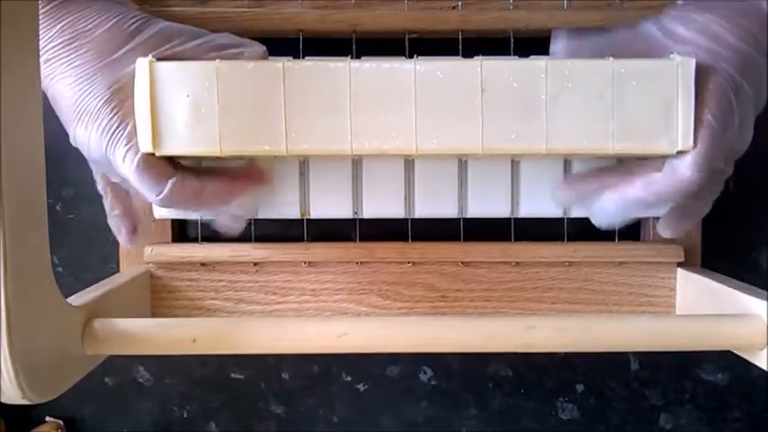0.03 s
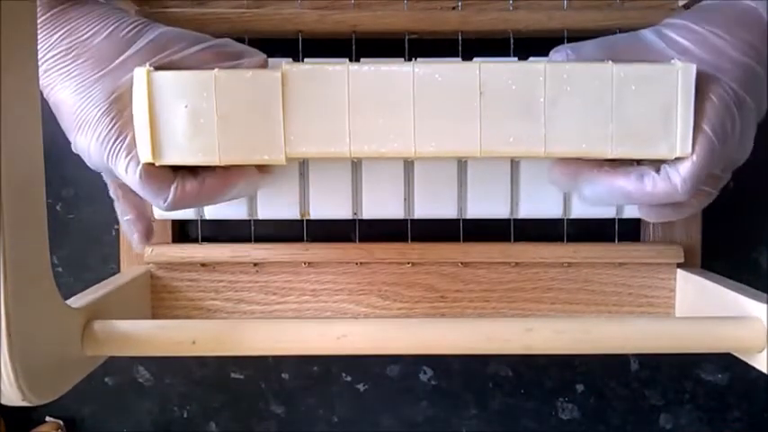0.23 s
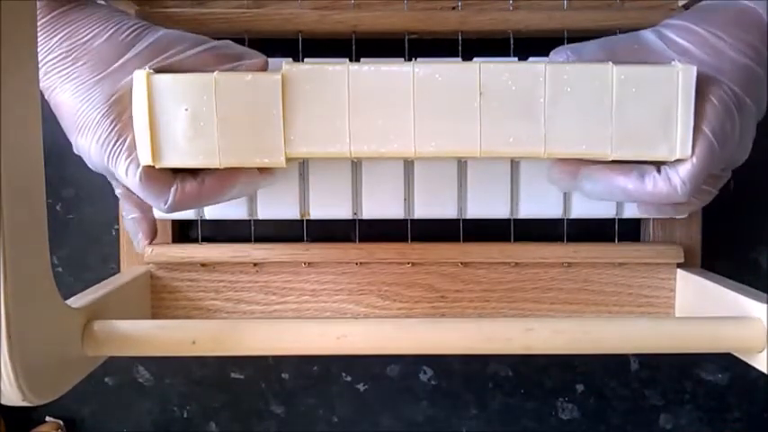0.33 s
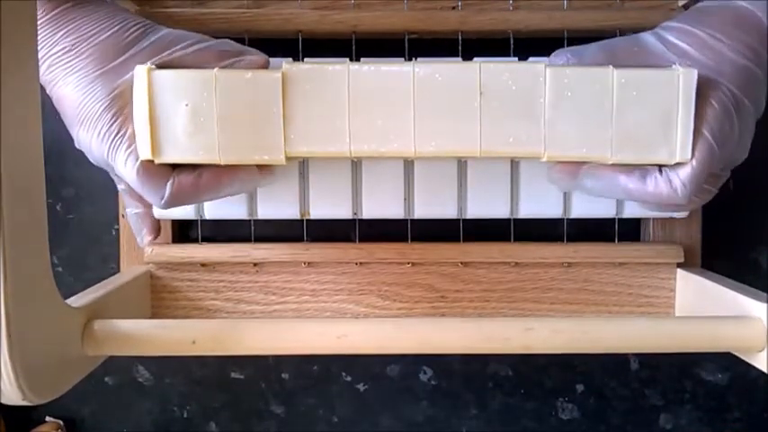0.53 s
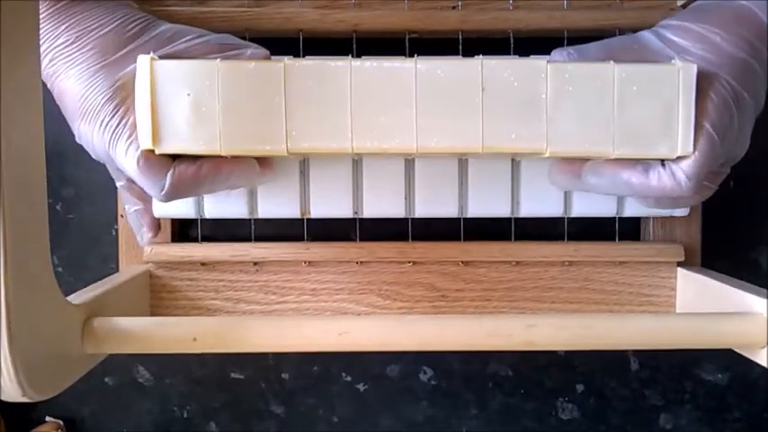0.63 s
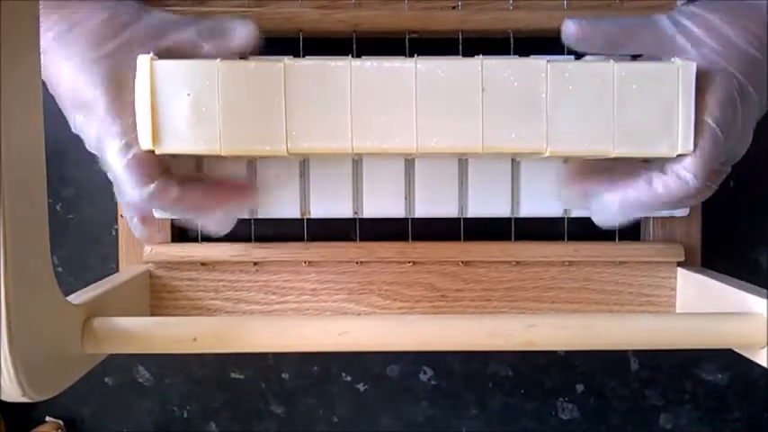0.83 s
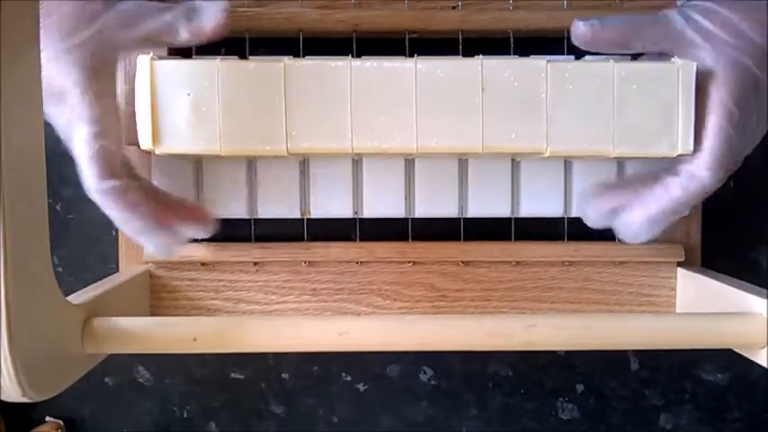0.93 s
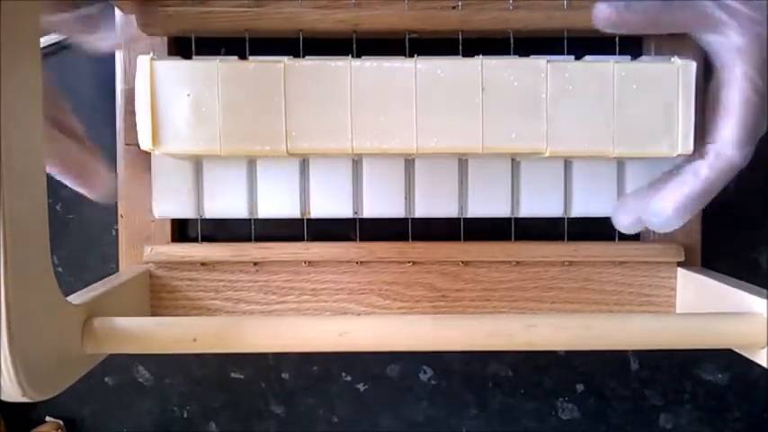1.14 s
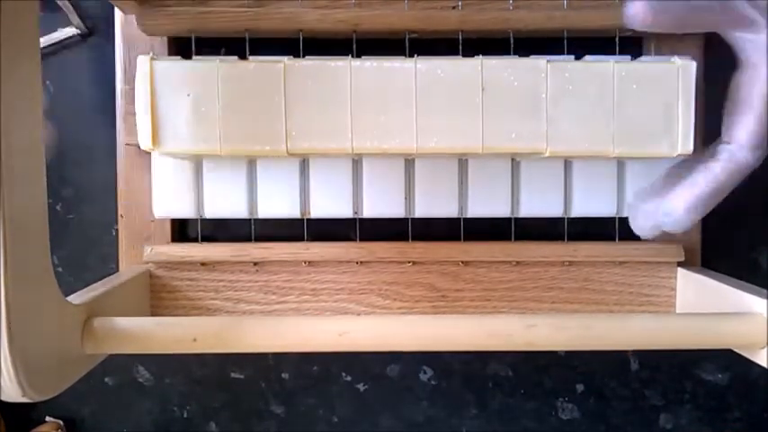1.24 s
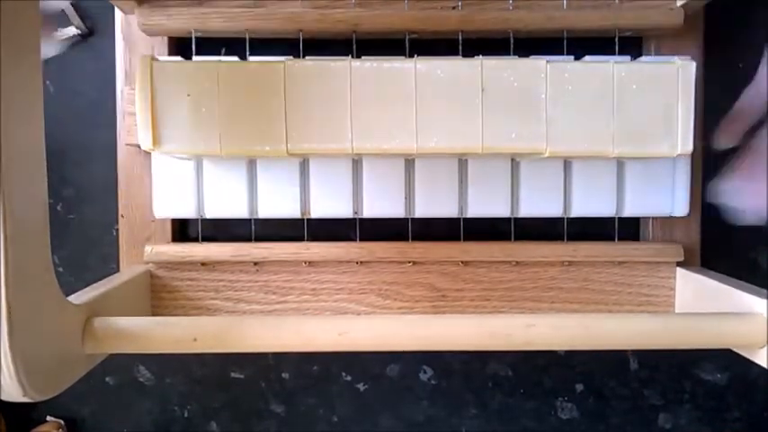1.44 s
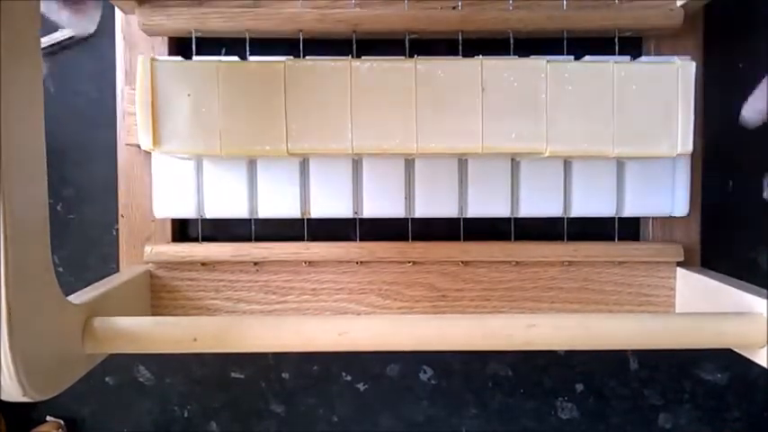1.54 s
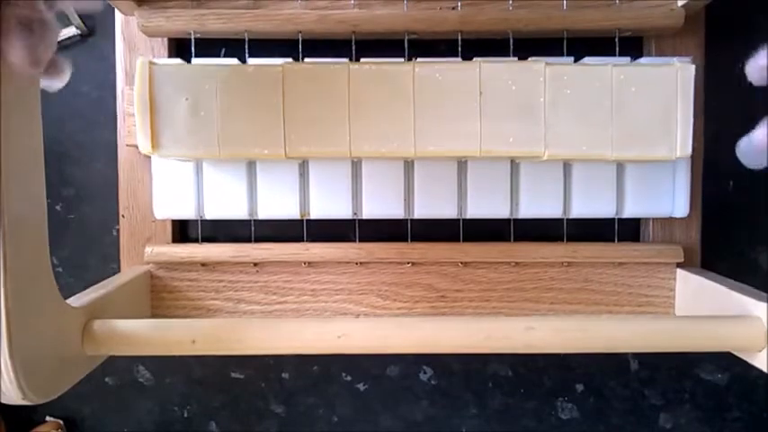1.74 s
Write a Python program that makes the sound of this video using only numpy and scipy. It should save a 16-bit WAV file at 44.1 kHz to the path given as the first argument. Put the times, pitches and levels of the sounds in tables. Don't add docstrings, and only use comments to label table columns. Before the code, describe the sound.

A soap block knocks sharply on a wooden wire cutter, bounces quickly with rattling wires, then bumps the counter and gets light dull taps; gloves crinkle close to a small microphone in a quiet humming room.

```python
import sys
import numpy as np
from scipy import signal
from scipy.fft import rfft, irfft
from scipy.io import wavfile
from scipy.ndimage import uniform_filter1d

SR = 44100
rng = np.random.default_rng(int(sys.argv[2]) if len(sys.argv) > 2 else 0)


def gain_from_db(level_db):
    decades = np.asarray(level_db, float) / 20
    return 10 ** decades


def bounce(signal):
    frames = np.transpose(np.atleast_2d(signal))
    limited = np.clip(frames, -1, 1)
    pcm = np.round(limited * 32767).astype(np.int16)
    wavfile.write(sys.argv[1], SR, pcm)


N = 79380
KNOCK_S = .2112
WET_DB = -12


def evened(x):
    return x / np.sqrt(np.mean(x ** 2) + 1e-20)


def read(points, hz):
    f, value = np.transpose(points)
    return np.interp(np.log(hz + 1), np.log(f + 1), value)


def level(points):
    s, db = np.transpose(points)
    return gain_from_db(np.interp(np.arange(N) / SR, s, db))


def add(mix, s, sound):
    part = mix[round(s * SR):][:len(sound)]
    part += sound[:len(part)]


def colour(x, points):
    return evened(irfft(rfft(x) * gain_from_db(read(points, np.fft.rfftfreq(N, 1 / SR))), N))


def grains(per_s, spread_db):
    on = rng.random(N) < per_s / SR
    sign = rng.standard_normal(N)
    size = np.minimum(rng.exponential(1, N), 4)
    return on * sign * gain_from_db(spread_db * size) + 0.2 * rng.standard_normal(N)


def rise(t):
    return np.sin(np.pi / 2 * np.clip(t / 0.0039, 0, 1)) ** 2


def struck(blows, modes):
    out, t = np.zeros(N), np.arange(SR // 2) / SR
    rings = np.array([gain_from_db(db - 60 * t / t60) * np.sin(2 * np.pi * hz * t) for hz, db, t60 in modes])
    shape = (30, len(modes))
    spots = gain_from_db(1.5 * rng.standard_normal(shape)) * rng.choice([-1, 1], shape)
    spots[:, :2] = abs(spots[:, :2])
    for (s, db, contact_ms), spot in zip(blows, spots):
        push = np.sin(np.pi * np.minimum(t[:600] / (contact_ms / 1000), 1)) ** 2
        add(out, s, gain_from_db(db) * signal.fftconvolve(spot @ rings, push / push.sum()) / 2)
    return out


# (time [s], level [dB])
HUM = [(0, -62), (.12, -60), (.3, -59), (.55, -69), (.9, -62), (1.1, -60.5), (1.18, -57.5), (1.22, -68),
       (1.33, -61.5), (1.5, -63.5), (1.8, -63.5)]


def room_hum():
    hum_hz, width_hz = 170, 3
    noise = [1, 1j] @ rng.standard_normal((2, N))
    waver = signal.lfilter([1], [1, -np.exp(-np.pi * width_hz / SR)], noise)
    tone = (waver * np.exp(2j * np.pi * hum_hz * np.arange(N) / SR)).real
    return level(HUM) * evened(tone)


# (time [s], level [dB])
SLIDE = [(0, -54.5), (.1, -66.5), (.7, -67), (.85, -58), (1.05, -61.5), (1.25, -63), (1.45, -59.5),
         (1.56, -57.5), (1.65, -62), (1.8, -64)]
# (frequency [Hz], density [dB per Hz])
SLEEVE = [(200, -3), (500, 8.5), (1000, -4), (2200, 1.5), (3200, -2.5), (4500, -16.5)]


def sleeves():
    return colour(rng.standard_normal(N), SLEEVE) * level(SLIDE)


# (frequency [Hz], density [dB per Hz])
AIR = [(12, -33), (20, -1.5), (107, -7.5), (241, -15.5), (422, -12), (574, -13.5), (624, -17), (780, -19),
       (16000, -31.5)]


def room_air():
    return gain_from_db(-57) * colour(rng.standard_normal(N), AIR)


# (time [s], level [dB])
RUB = [(0, -56), (.018, -53), (.023, -42.5), (.06, -52), (.12, -68), (.2, -68.5), (.85, -68), (.9, -58.5),
       (.945, -55), (1.03, -62), (1.1, -65), (1.2, -62), (1.3, -71.5), (1.46, -64), (1.56, -66.5),
       (1.66, -60.5), (1.8, -63.5)]
# (frequency [Hz], density [dB per Hz])
GLOVE = [(300, -35), (1000, 0), (2200, 0), (3500, -6), (5200, 4.5), (7000, -1.5), (9000, -14), (12000, -56)]
# (time [s], level [dB], pitch [Hz], t60 [s], width [share of pitch])
SNAPS = [(0.0202, -25, 4100, 0.0084, 0.66), (0.0235, -33.5, 5370, 0.017, 0.096),
         (.785, -46, 2050, 0.05, 0.04), (0.786, -51, 2810, 0.13, 0.053), (0.881, -51, 4630, 0.023, 0.27),
         (0.891, -48, 4100, 0.056, 0.034), (0.9035, -43, 4100, 0.016, 0.094),
         (1.466, -39, 7440, 0.013, 0.1), (1.466, -45.5, 4800, 0.015, 0.37), (1.192, -55, 3986, 0.13, 0.018),
         (1.617, -58, 4060, 0.23, 0.016), (1.611, -57, 2800, 0.072, 0.058),
         (0.0202, -26.5, 6800, 0.0083, 0.22), (0.0236, -34.5, 6800, 0.014, 0.071),
         (.046, -48, 4100, 0.033, .06), (0.211, -39, 7000, 0.0093, 0.19), (.896, -54, 5500, .06, 0.11),
         (.928, -52.5, 6600, 0.043, 0.063), (.939, -52, 8450, 0.025, .3), (.944, -50.5, 5400, 0.077, 0.069),
         (.944, -50.5, 6800, 0.038, 0.074), (0.986, -49, 2670, 0.025, .15), (.811, -57.5, 3120, 0.037, .05),
         (0.2124, -33, 4010, 0.038, 0.048), (.2125, -39, 4700, 0.033, 0.044),
         (0.2128, -36, 5310, 0.036, .05), (.263, -43.5, 4100, 0.06, .06), (.263, -48.5, 5120, 0.06, 0.078),
         (.812, -40, 720, .08, .1), (.287, -31, 660, .06, .06), (.0204, -36, 1900, .012, .4),
         (.9895, -38, 740, .03, .12)]


def gloves():
    crinkles_per_s, crinkle_spread_db = 2500, -1
    out = colour(grains(crinkles_per_s, crinkle_spread_db), GLOVE) * level(RUB)
    t = np.arange(3000) / SR
    noise = rng.standard_normal((16, 3000))
    noise = np.vstack([noise, noise[:, ::-1]])
    for (s, db, hz, t60, wide), n in zip(SNAPS, noise):
        edges = [hz / (1 + wide), hz * (1 + wide)]
        band = signal.lfilter(*signal.butter(3, edges, "band", fs=SR), n)
        start = np.minimum(t * wide / 0.000079, 1)
        add(out, s, evened(band) * gain_from_db(db - 60 * t / t60) * start)
    return out


# (frequency [Hz], t60 [s])
ROOM = [(60, 0.27), (250, 0.33), (1000, 0.25), (4000, 0.42), (9000, 0.14)]


def room(x):
    taps = np.zeros(SR // 2)
    at = np.arange(150, SR // 2 - 20, 20)
    taps[at + rng.integers(0, 20, len(at))] = rng.choice([-1., 1.], len(at))
    hz, t, z = signal.stft(taps, SR, nperseg=256)
    decay = gain_from_db(-60 * t / read(ROOM, hz)[:, None])
    tail = signal.istft(z * decay, SR, nperseg=256)[1]
    return signal.fftconvolve(x, tail / np.linalg.norm(tail))[:N]


# (time [s], frequency [Hz], level [dB])
LEFT = [(.011, 10300, -75), (.011, 13800, -67), (.013, 5800, -57), (.012, 8500, -74), (.008, 6800, -69),
        (.101, 1100, -63.5), (.101, 2810, -59), (.101, 4800, -58), (.101, 5050, -56), (.101, 6300, -64),
        (1.314, 3420, -64), (1.314, 5540, -64.5), (1.637, 4060, -58.5), (1.636, 4720, -60),
        (1.63, 2800, -66), (1.68, 1690, -62), (1.68, 2130, -65), (1.68, 2800, -58.5), (1.68, 3900, -62),
        (1.68, 4980, -57.5), (1.68, 5320, -61)]


def lone_tones():
    t, length_s = np.arange(N) / SR, .04
    out = np.zeros(N)
    for s, hz, db in LEFT:
        swell = np.cos(np.pi * np.clip((t - s) / length_s, -.5, .5)) ** 2
        out += gain_from_db(db) * swell * np.sin(2 * np.pi * hz * t)
    return out


# (time [s], half length [s], depth [dB], lower edge [Hz])
GAPS = [(.012, .0045, -30, 6000), (.101, .005, -16, 760), (1.314, .007, -32, 760), (1.636, .008, -18, 760),
        (1.68, .007, -16, 760)]


def treble_dropouts(x):
    t = np.arange(N) / SR
    for s, half_s, db, hz in GAPS:
        high = signal.sosfiltfilt(signal.butter(4, hz, "high", fs=SR, output="sos"), x)
        x = x - (1 - gain_from_db(db * np.exp(-((t - s) / half_s) ** 4))) * high
    return x


# (time [s], level [dB])
SEAMS = [(.0205, -44), (0.268, -39), (.2901, -38), (.908, -37), (.9307, -42), (1.5498, -34), (1.5727, -45)]


def seam_ticks():
    ticks = sum(gain_from_db(db) * (np.arange(N) == round(s * SR)) for s, db in SEAMS)
    return signal.lfilter(*signal.butter(2, 5000, "high", fs=SR), ticks)


# (time [s], level [dB], contact [ms])
BUMPS = [(.045, -42, 10), (.08, -40, 2.9), (.15, -45, 3), (.42, -40.5, 5.7), (.725, -43, 9),
         (.7625, -24.5, 2.7), (.77, -30.5, 1.8), (.788, -26, 1.5), (.803, -33, 0.36), (.818, -30.5, 1.23),
         (.838, -25, 4.9), (.86, -48, 6.7), (.88, -36, 6.8), (.91, -36, 9), (1.14, -55, 12),
         (1.282, -43, 6), (1.307, -37.5, 3.2), (1.47, -43, 3.4), (1.635, -37.5, 5.9), (1.652, -42, 10.6),
         (1.722, -42, 4.7), (1.742, -49, 5.4), (.775, -27.5, 2.1), (.782, -23, 2.04), (.794, -35, 0.88),
         (.81, -29.5, 1.6), (.828, -34.5, 0.83), (.85, -46, 1.5), (1.1, -47.5, 2.2), (.385, -39, 5)]
# (frequency [Hz], level [dB], t60 [s])
COUNTER = [(45.7, 1.5, 0.11), (60.3, 1.5, 0.085), (106, -2.5, 0.045), (165.3, -1, 0.085), (241, -7.5, 0.05),
           (350, -6.5, 0.078), (405, -0.5, 0.066), (607, -7.5, 0.035), (710, -2, 0.026),
           (1140, -10.5, 0.059), (2050, -30, .05), (2700, -36, 0.046)]


def counter_bumps():
    return struck(BUMPS, COUNTER)


# (time [s], level [dB], contact [ms])
KNOCKS = [(.2112, -9, 0.31), (.2165, -15, 1.9), (.2315, -12.5, 1.8), (.2415, -23, 0.5), (.248, -18, 3.8),
          (.2628, -12.5, 0.39), (.276, -15.5, 3.5), (.29, -27, 0.66), (.3, -20.5, 2.5), (.317, -20.5, 2.04)]
# (frequency [Hz], level [dB], t60 [s])
FRAME = [(135.8, -12.5, 0.21), (185, -1.5, 0.054), (270, -1.5, 0.018), (379, -11, 0.069),
         (442, -13.5, 0.052), (507, -17.5, 0.038), (640, -14.5, 0.17), (970, -30, .05), (1105.5, -16, 0.12),
         (1596, -17, 0.075), (2050, -12.5, 0.02), (2720, -13.5, 0.033), (4100, -10, 0.043),
         (5410, -10, 0.035)]


def frame_knocks():
    return struck(KNOCKS, FRAME)


# (time [s], level [dB], contact [ms])
ROCKS = [
    (.2115, -33, 3.7),
    (.2225, -14, 1.3),
    (.2308, -21.5, 4.4),
    (.273, -20, 7),
]
# (frequency [Hz], level [dB], t60 [s])
BASE = [(75.3, -1.4, 0.47), (119.3, -1.6, 0.57)]


def cutter_rocks():
    return struck(ROCKS, BASE)


# (time [s], level [dB], brightness [dB per octave])
SHAKES = [(0.2118, -32, 2), (0.23, -34.5, -1), (0.262, -32, -8.5), (0.786, -48, -6.5), (0.805, -44, -8.5),
          (0.245, -42.5, -2), (0.281, -46.5, -3.5), (.764, -51, -3)]
# (frequency [Hz], density [dB per Hz])
CHATTER = [(180, -40), (300, -8), (379, 3), (532, -10.5), (625, 1), (1090, -4.5), (3970, -17.5),
           (5500, -29.5), (9000, -46.5), (16000, -100)]
# (frequency [Hz], t60 [s])
CHATTER_T60 = [(300, 0.22), (1000, 0.22), (3000, 0.26), (5500, 0.19), (8000, 0.25)]


def wire_chatter():
    rattle = colour(grains(6000, 1.5), CHATTER)
    hz, t, z = signal.stft(rattle, SR, nperseg=256, noverlap=192)
    lumps_db = 3 * evened(uniform_filter1d(rng.standard_normal(z.shape), 14, 1))
    z = z * gain_from_db(lumps_db)
    out, now = np.zeros(N), np.arange(N) / SR
    octaves = np.log2(1 + hz / 1000)[:, None]
    t60 = read(CHATTER_T60, hz)[:, None]
    for s, db, bright_db in SHAKES:
        shape_db = db + bright_db * octaves - 60 * np.maximum(t - s, 0) / t60
        shaken = signal.istft(z * gain_from_db(shape_db), SR, nperseg=256, noverlap=192)[1][:N]
        out += shaken * rise(now - s)
    return out


def knock_crack():
    t = np.arange(N) / SR - KNOCK_S
    level_db, t60, peak_hz = -28.5, 0.036, 3900
    spectrum = [(500, -10), (peak_hz, 0), (5500, -6), (9000, -34), (14000, -70)]
    crack = colour(rng.standard_normal(N), spectrum)
    return crack * gain_from_db(level_db - 60 * np.maximum(t, 0) / t60) * rise(t)


# (time [s], level [dB], contact [ms])
TAPS = [(.9033, -41, 0.26), (.929, -33.5, 1.64), (.948, -40, 0.25), (.9845, -30, 0.65), (.9905, -39, 0.98),
        (1.001, -34, 1.05), (1.011, -37.5, 0.82), (1.057, -59, 0.19), (.934, -42, 0.8), (.956, -41, 0.69)]
# (frequency [Hz], level [dB], t60 [s])
BLOCK = [(458, 0.5, 0.048), (571, 3, 0.032), (749, 0, 0.035), (840, -2.5, 0.019), (1484, 5, 0.014),
         (1995, -2.5, 0.035), (2800, 0, 0.026), (4100, -11, 0.042)]


def block_taps():
    return struck(TAPS, BLOCK)


def scene():
    t = np.arange(N) / SR - KNOCK_S
    choke_db, choke_s = -4, .12
    choke = gain_from_db(choke_db * np.clip(t / choke_s, 0, 2) ** 3 * (t < .5))
    frame = frame_knocks()
    near = counter_bumps() + block_taps() + gloves()
    cutter = frame + cutter_rocks() + gain_from_db(WET_DB) * room(frame) + wire_chatter() + knock_crack()
    echo = gain_from_db(WET_DB) * room(near)
    background = room_hum() + sleeves() + room_air()
    return (choke * cutter + near + echo + background)[None]


def roll_off(x):
    return signal.sosfilt(signal.butter(12, 16400, fs=SR, output="sos"), x)


def record(dry):
    out = signal.sosfilt(signal.butter(2, 28.8, "high", fs=SR, output="sos"), dry)
    out = treble_dropouts(out) + lone_tones() + seam_ticks()
    treble_limit = signal.firwin(1023, 15830, window=("kaiser", 9), fs=SR)
    out = signal.oaconvolve(out, treble_limit[None], "same")
    return roll_off(out)


dry = scene()
out = record(dry)
bounce(out)
```